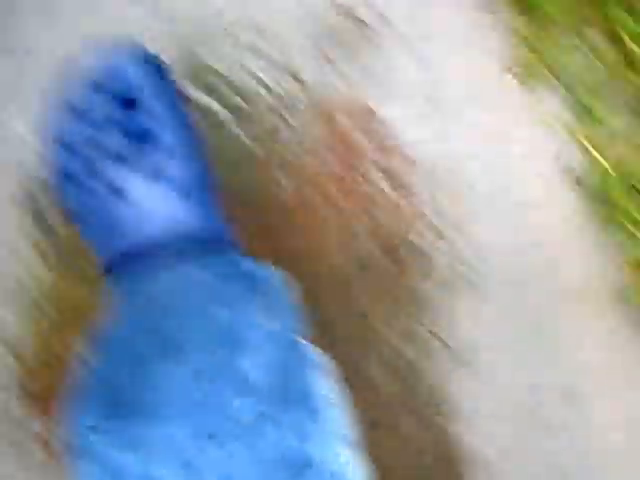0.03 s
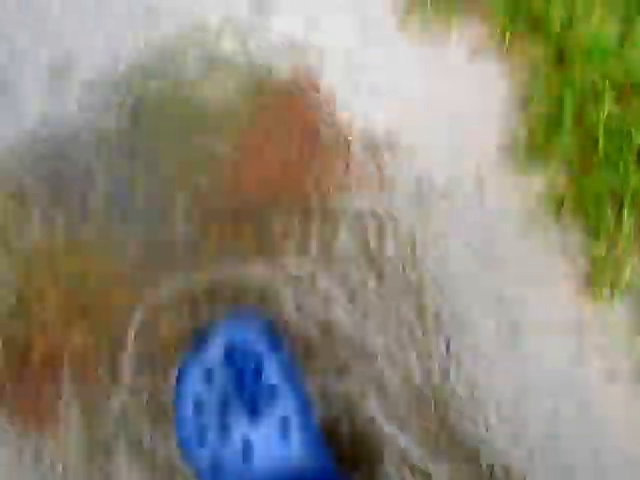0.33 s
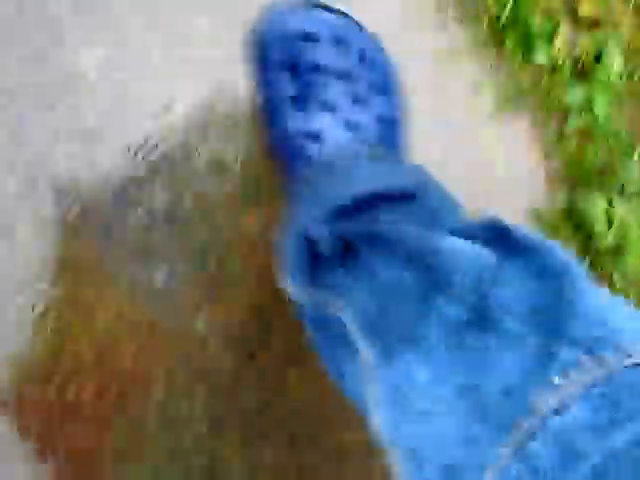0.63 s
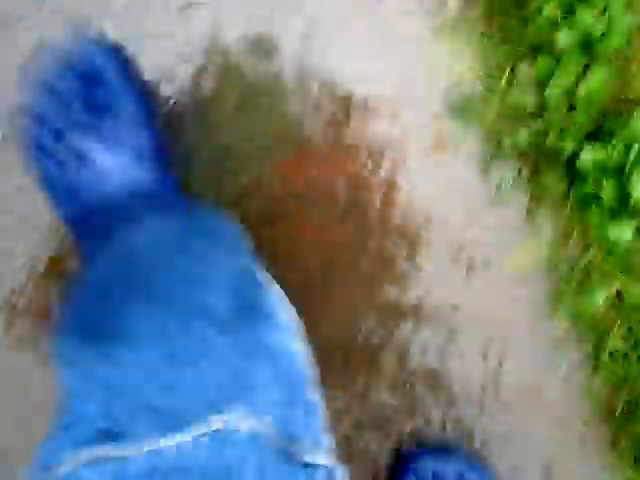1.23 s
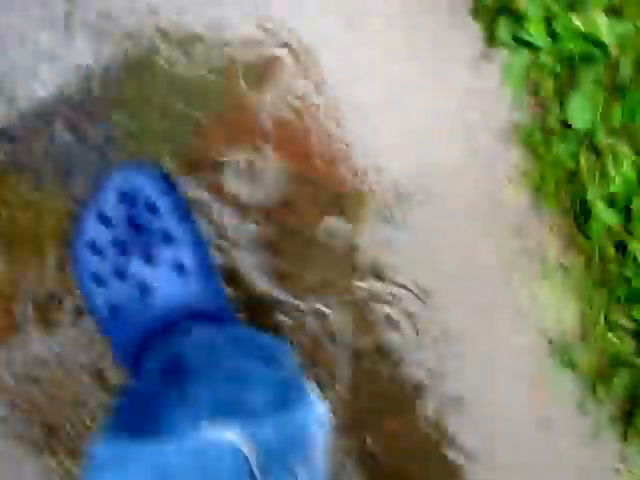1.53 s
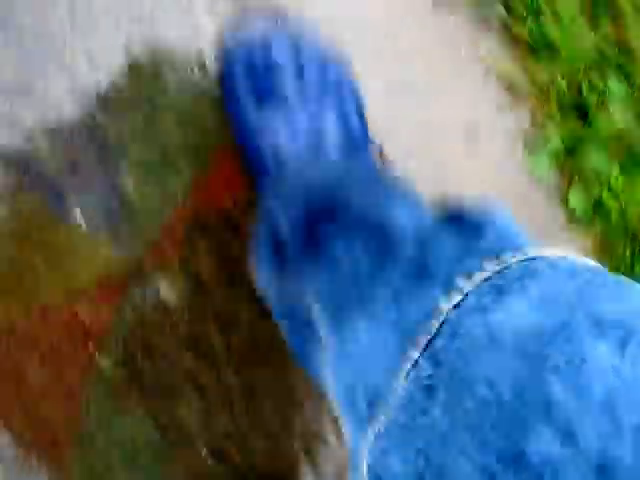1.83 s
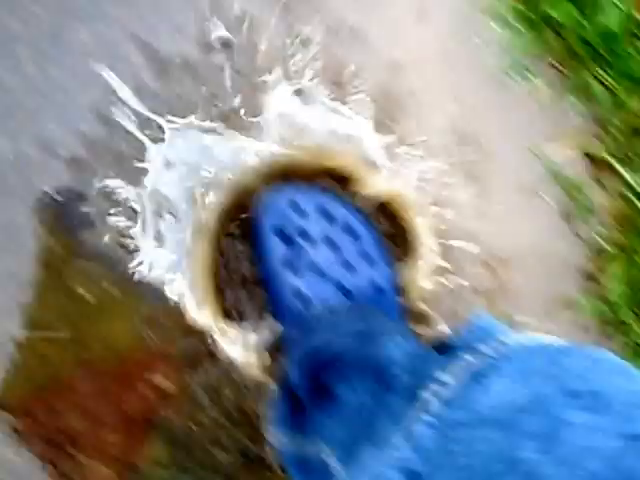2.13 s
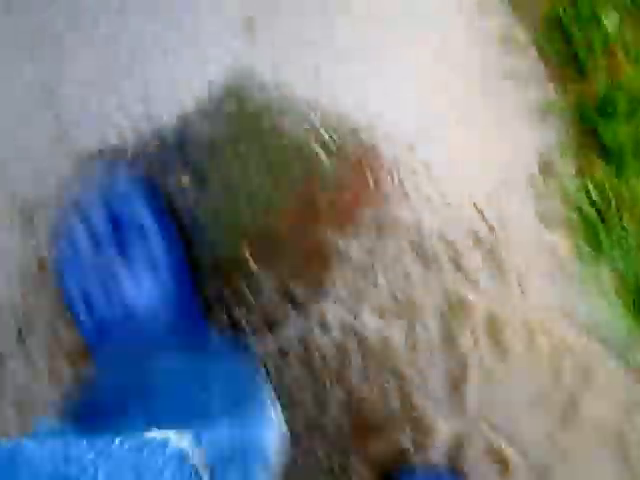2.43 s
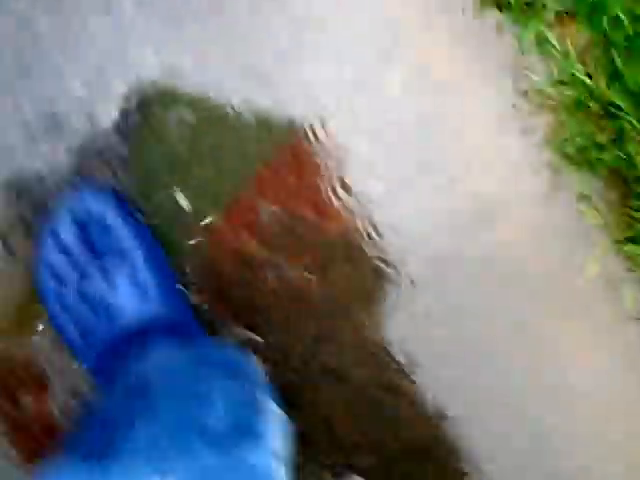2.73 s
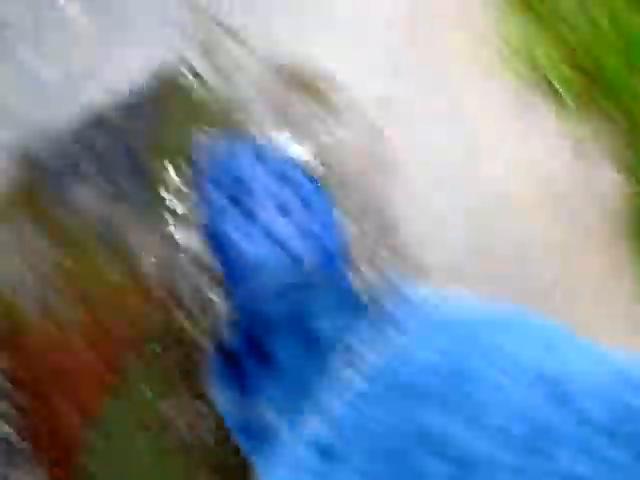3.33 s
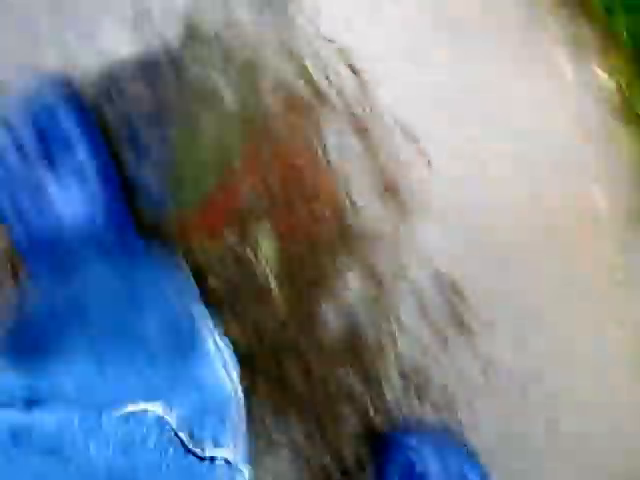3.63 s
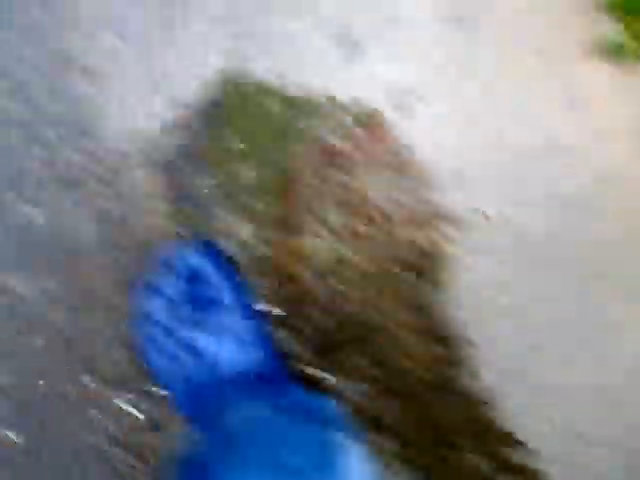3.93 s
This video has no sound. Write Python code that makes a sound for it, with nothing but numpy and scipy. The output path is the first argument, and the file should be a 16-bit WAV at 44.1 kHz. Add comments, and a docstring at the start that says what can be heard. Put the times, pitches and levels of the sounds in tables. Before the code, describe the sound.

Footsteps in rubber clogs splash through shallow puddles at a walking pace, each throwing a fine spray and a few plinking drops. Loud gusts rumble and flutter on the close microphone, with light rain hissing faintly outdoors.

```python
"""Puddle steps in gusty wind

Someone in rubber clogs walks through shallow puddles, about three steps in two seconds. Each step
throws a fine spray and a few drops that click and ring as bubbles. Wind eddies rumble, flutter and
slap on the microphone and overload it at the peaks; light rain hisses behind."""
import sys
import numpy as np
from scipy import signal
from scipy.io import wavfile
from scipy.ndimage import uniform_filter1d

SR = 44100
rng = np.random.default_rng(int(sys.argv[2]) if len(sys.argv) > 2 else 0)


def store_wav(level_fs):
    """Save 16-bit WAV to argv[1]."""
    pcm = np.round(np.clip(np.atleast_2d(level_fs), -1, 1) * 32767)
    wavfile.write(sys.argv[1], SR, pcm.T.astype(np.int16))


N = 176400
T = np.arange(N) / SR


def from_db(db):
    """Decibels to gain."""
    return 10 ** (np.asarray(db) / 20)


def rms_one(x):
    """Scale to rms 1."""
    return x / np.sqrt(np.mean(x ** 2) + 1e-20)


def in_time(rows):
    """A control curve through (seconds, value) points."""
    return np.interp(T, *np.transpose(rows))


def swell(peak_s, rise, fall):
    """A smooth rise to 1 at peak_s, then an exponential fall."""
    return np.exp(np.where(T < peak_s, -((T - peak_s) / rise) ** 2, (peak_s - T) / fall).clip(-30, 0))


def drift(rate_hz):
    """A smooth random wander of rms about 1, mostly slower than rate_hz."""
    hop = 40
    pole = np.exp(-2 * np.pi * rate_hz * hop / SR)
    slow = signal.lfilter([1], [1, -2 * pole, pole * pole], rng.standard_normal(N // hop + 2002))[2000:]
    return np.interp(np.arange(N) / hop, np.arange(len(slow)), rms_one(slow))


def noise_bands(colour, low_hz, count, order=3):
    """Half-octave noises as (centre in Hz, noise); together they have an rms of about 1."""
    centres = low_hz * 2 ** (np.arange(count) / 2)
    colour_hz, colour_db = np.transpose(colour)
    gains = from_db(np.interp(np.log(centres), np.log(colour_hz), colour_db)) * np.sqrt(centres)
    for hz, gain in zip(centres, gains / np.linalg.norm(gains)):
        sos = signal.butter(order, [hz / 2 ** .25, hz * 2 ** .25], "band", fs=SR, output="sos")
        yield hz, gain * rms_one(signal.sosfilt(sos, rng.standard_normal(N + SR // 2))[-N:])


# The level of the hiss of light rain and wind, swelling with the strongest gust.
# Each row: time in seconds, level in dB before the trim.
HISS_LEVELS = [(0.02, -56.5), (0.33, -53.5), (1.18, -54.5), (1.5, -49.5), (1.82, -56.5), (2.32, -53),
               (2.41, -56), (3.71, -57.5), (3.98, -55.5)]
# The tone of the hiss. Each row: frequency in Hz, relative density in dB.
HISS_TONE = [(400, 14), (900, 3), (1800, 2), (3000, 0), (5200, -3), (8000, -8), (12000, -11.5),
             (15500, -15.5)]


def rain_and_wind_hiss(patchy_db=2.65, trim_db=7):
    """Light rain and wind make a soft hiss, each band flickering a little on its own."""
    bands = noise_bands(HISS_TONE, low_hz=440, count=11, order=2)
    hiss = sum(band * from_db(patchy_db * drift(rate_hz=45)) for _, band in bands)
    return from_db(in_time(HISS_LEVELS) + trim_db) * hiss


# The ride of the wind's low end. Each row: time in seconds, level in dB.
RUMBLE_LEVELS = [(0.02, -13.5), (0.58, -9.5), (0.61, -12.5), (1.17, -15), (1.36, -5), (1.61, -8.5),
                 (1.65, -21), (1.67, -10.5), (2.3, -17), (2.39, -6.5), (2.46, -12.5), (2.66, -11),
                 (2.68, -17.5), (2.94, -28.5), (3.01, -21), (3.2, -32), (3.24, -12), (3.3, -24),
                 (3.37, -10), (3.43, -21), (3.6, -17.5), (3.75, -24), (3.91, -11.5), (3.98, -7)]
# The tone of the rumble. Each row: frequency in Hz, relative density in dB.
RUMBLE_TONE = [(16, -4), (28, 7), (40, -11), (60, -2), (100, -13.5), (150, -24.5), (250, -53)]


def wind_rumble(neutral_db=-17.5, brightening=0.22):
    """Large eddies rock the diaphragm slowly; in a lull only the slowest are left."""
    level_db = in_time(RUMBLE_LEVELS)
    tilt_db = brightening * (level_db - neutral_db)  # per octave
    bands = noise_bands(RUMBLE_TONE, low_hz=18, count=8)
    rumble = sum(band * from_db(tilt_db * np.log2(hz / 40)) for hz, band in bands)
    running_rms = np.sqrt(uniform_filter1d(rumble ** 2, size=7000) + 1e-9)
    return rumble / running_rms * from_db(level_db)


# The breeze under the gusts. Each row: time in seconds, wind strength in dB.
BREEZE_STRENGTH = [(0, -17.5), (0.1, -26), (0.4, -28), (0.7, -40), (0.85, -29.5), (1.08, -26.5), (1.3, -21),
                   (1.8, -27.5), (2.1, -29), (2.68, -25), (2.87, -49), (3.15, -52.5), (3.3, -37.5),
                   (3.8, -42), (3.98, -28.5)]
# Gusts that swell and sink. Each row: peak time, rise and fall in seconds, wind strength in dB.
GUST_SWELLS = [(0.517, 0.068, 0.067, -11), (1.401, 0.065, 0.066, -12), (1.515, 0.054, 0.081, -14.5),
               (2.387, 0.069, 0.03, -17), (2.625, 0.053, 0.029, -19)]
# The tone of the flutter. Each row: frequency in Hz, relative density in dB.
FLUTTER_TONE = [(90, 0), (130, -0.5), (180, 2.5), (255, -0.5), (360, -6), (510, -11), (720, -16),
                (1020, -28.5), (1440, -38), (2040, -50.5)]


def wind_flutter(fit_db=2.5, neutral_db=-18, brightening=0.66, trim_db=-1):
    """Small eddies come in fits; the harder the gust, the higher their noise reaches."""
    gusts = sum(from_db(db) * swell(peak_s, rise, fall) for peak_s, rise, fall, db in GUST_SWELLS)
    wind = from_db(in_time(BREEZE_STRENGTH)) + gusts
    eddies = np.clip(drift(rate_hz=43.4), -2, 2)
    tears = np.clip(drift(rate_hz=186), -2, 2)  # the flow tears off the edge of the microphone port
    force_db = 20 * np.log10(wind) - neutral_db + fit_db * (eddies + tears)
    out = 0
    for hz, band in noise_bands(FLUTTER_TONE, low_hz=90, count=10):
        sensitivity = 1 + brightening * np.log2(np.clip(hz, 360, 1100) / 400)
        out += band * from_db(sensitivity * force_db)
    return from_db(neutral_db + trim_db) * out


# Single eddies that slap the microphone. Each row: start in seconds, length in seconds,
# level in dB, tilt around 400 Hz in dB per octave.
EDDY_SLAPS = [(0.111, 0.005, -14, -4.7), (0.133, 0.0042, -16, -11), (0.157, 0.0091, -24, -3.5),
              (0.22, 0.021, -18, -6), (0.341, 0.022, -23.5, -8), (0.457, 0.0058, -19.5, -7),
              (0.495, 0.022, -18.5, -7.5), (0.515, 0.0044, -13.5, 3.5), (0.536, 0.0064, -20.5, 4.5),
              (0.56, 0.011, -14.5, -11), (0.581, 0.0082, -15.5, 1), (0.613, 0.0095, -20, -4.5),
              (0.643, 0.0085, -19.5, -9), (0.667, 0.0029, -17.5, -6.5), (0.732, 0.0048, -15, -8.5),
              (0.74, 0.0045, -19.5, -9.5), (0.782, 0.012, -20.5, -7.5), (0.874, 0.009, -25, -8),
              (0.907, 0.0037, -17.5, -9), (0.936, 0.0064, -23, -4.5), (0.98, 0.0055, -12.5, -6),
              (1.206, 0.013, -18.5, -3.5), (1.237, 0.0084, -12.5, 0), (1.31, 0.0058, -8.5, -2),
              (1.339, 0.0048, -16.5, 1.5), (1.458, 0.0056, -11, 4.5), (1.473, 0.0063, -14, 5),
              (1.517, 0.026, -19.5, 7), (1.574, 0.0064, -9, -2.2), (1.638, 0.0062, -10.5, -2.6),
              (1.665, 0.0042, -15.5, -7.5), (2.002, 0.019, -28, -8), (2.394, 0.0039, -19, 11.5),
              (2.405, 0.0067, -19, 2.5), (2.505, 0.0087, -20.5, -14), (2.544, 0.013, -11.5, -4.5),
              (2.601, 0.032, -23.5, -4), (2.636, 0.011, -24.5, -1), (2.659, 0.02, -22.5, -7.0),
              (2.725, 0.013, -28.5, -12.5), (3.017, 0.0069, -30.0, -0.5), (3.065, 0.0068, -32.5, -4),
              (3.226, 0.006, -28, -10.5), (3.265, 0.0066, -31, -13.5), (3.331, 0.021, -16, -7),
              (3.496, 0.0024, -22.0, -9), (3.566, 0.0033, -28.5, -6), (3.601, 0.0069, -20.5, -8),
              (3.897, 0.0051, -23.5, -14.5), (3.932, 0.0053, -21.5, -9)]
# The tone of a slap before its tilt. Each row: frequency in Hz, relative density in dB.
SLAP_TONE = [(90, -12), (180, -2), (360, -4), (510, -5.5), (720, -8.5), (1020, -14.5), (1440, -22.5),
             (2040, -37)]


def wind_buffets(rise_share=.3):
    """Each eddy is a dull slap that rises quickly and is gone; the brightest reach the upper mids."""
    start_s, lengths, level_db, tilt_db = np.transpose(EDDY_SLAPS)
    out, t = np.zeros(N), T[:SR // 8]
    for hz, band in noise_bands(SLAP_TONE, low_hz=90, count=10):
        gains = from_db(level_db + tilt_db * np.log2(hz / 400))
        push = np.zeros(N + SR)
        for start, length, gain in zip((start_s * SR).astype(int), lengths, gains):
            attack = np.minimum(t / (rise_share * length), 1)
            push[start:start + len(t)] += gain * attack * np.exp(-.5 * (t / length) ** 4)
        # Hold the noise steady so that no slap lands in a dip.
        leveller = band.std() / np.sqrt(uniform_filter1d(band ** 2, size=500) + 1e-14)
        out += band * leveller * push[:N]
    return out


def droplets(hz, per_s, ring_cycles=12, spread_db=6):
    """Tiny droplets of random size ring at one pitch, each fading 60 dB over ring_cycles."""
    born = rng.random(N) < per_s / SR
    sizes = from_db(spread_db * np.minimum(rng.exponential(1, N), 4)) * rng.choice([-1, 1], N)
    pole = np.exp(-np.log(1000) * hz / (ring_cycles * SR))
    resonator = [1, -2 * pole * np.cos(2 * np.pi * hz / SR), pole * pole]
    return rms_one(signal.lfilter([1, 0, -1], resonator, born * sizes + 1e-18))


# A clog pushes the water aside. Each row: peak time, rise and fall in seconds, level in dB,
# tilt around 6000 Hz in dB per octave.
STEP_SPLASHES = [(0.19, .022, 0.035, -42.5, -1.5), (0.53, 0.035, .08, -51, -11),
                 (0.872, .035, 0.047, -42.5, 0), (1.0, 0.02, .03, -50.5, -5), (1.495, 0.022, 0.02, -45, -1),
                 (2.135, 0.0056, 0.017, -39.5, 3), (2.172, 0.016, 0.019, -36.5, -2),
                 (2.32, 0.045, 0.14, -52, 2), (2.8, 0.091, 0.17, -56.5, -5.5),
                 (3.288, 0.0064, 0.014, -46.5, 5), (3.355, 0.024, .045, -47.5, 1.5),
                 (3.515, 0.028, 0.033, -47.5, -5), (3.79, .03, 0.051, -57, 7),
                 (3.899, 0.0076, 0.014, -39.5, -3.5)]
# The tone of the spray before its tilt. Each row: frequency in Hz, relative density in dB.
SPRAY_TONE = [(900, -19), (1600, -3), (3000, 1.5), (5000, 5.5), (7500, 3.5), (11000, -2), (15500, -7.5)]


def splashes(droplets_per_s=9000, mist_share=0.29):
    """Each step throws up a spray: tiny ringing droplets over a fine mist, swelling and dying away."""
    swells = np.array([swell(peak_s, rise, fall) for peak_s, rise, fall, _, _ in STEP_SPLASHES])
    *_, level_db, tilt_db = np.transpose(STEP_SPLASHES)
    bands = list(noise_bands(SPRAY_TONE, low_hz=1200, count=8, order=2))
    out = 0
    for hz, mist in bands:
        pitches = hz * 2 ** (np.arange(-1, 2) / 6)
        per_s = droplets_per_s / (len(pitches) * len(bands))
        patter = mist.std() * rms_one(sum(droplets(pitch, per_s) for pitch in pitches))
        spray = np.sqrt(mist_share) * mist + np.sqrt(1 - mist_share) * patter
        envelope = from_db(level_db + tilt_db * np.log2(hz / 6000)) @ swells
        out += spray * envelope
    return out


# Single drops and slaps of water. Each row: start in seconds, bubble peak in dB,
# starting pitch in Hz, click trim in dB.
WATER_DROPS = [(0.099, -43, 9000, 9), (0.171, -33, 1980, -1), (0.412, -40.5, 12000, 7),
               (0.513, -26, 2840, -7), (0.943, -36, 6500, 3), (1.002, -44, 11000, 0),
               (1.016, -38, 13000, -9), (1.396, -31, 11500, 1.5), (2.169, -22, 1760, -8),
               (2.22, -34.5, 6960, -6), (2.290, -31, 2680, 4.5), (2.311, -26.5, 1800, -14),
               (2.318, -27, 13200, -15), (2.341, -33, 2970, -10), (2.367, -34, 6800, -10),
               (2.387, -25, 3060, -8), (2.393, -20.5, 1410, -11), (2.414, -34, 1670, 2),
               (2.421, -32, 5700, 0), (2.610, -32, 6400, -0.5), (2.849, -35.5, 2570, -14),
               (2.899, -29, 2480, -4), (3.062, -41, 5000, -9), (3.252, -43, 7000, 7),
               (3.307, -36.5, 2900, -7), (3.372, -33, 4870, -10), (3.40, -37.5, 3220, -10),
               (3.428, -41, 7500, -8), (3.822, -36, 4340, 6.5)]


def drops(ring_cycles=31, pitch_rise=0.04, click_decay_s=0.0021):
    """A drop lands with a click and traps a bubble that rings briefly, rising in pitch."""
    out, t = np.zeros(N + SR), T[:SR // 20]
    click_band = signal.butter(1, [1500, 12000], "band", fs=SR, output="sos")
    for start_s, level_db, hz, click_db in WATER_DROPS:
        age = t * hz / ring_cycles  # 1 when the bubble has faded 60 dB
        pitch = hz * (1 + pitch_rise * np.minimum(age, 1))
        bubble = np.sin(2 * np.pi * np.cumsum(pitch) / SR) * np.exp(-np.log(1000) * age)
        noise = rms_one(signal.sosfilt(click_band, rng.standard_normal(len(t))))
        click = .5 * from_db(click_db) * noise * np.exp(-t / click_decay_s)
        start = int(start_s * SR)
        out[start:start + len(t)] += from_db(level_db) * (bubble + click)
    return out[:N]


def scene():
    """Wind at the microphone, water at the feet and a hiss behind, mixed in mono."""
    wind = wind_rumble() + wind_flutter() + wind_buffets()
    return (wind + splashes() + drops() + rain_and_wind_hiss())[None]


def record(dry):
    """The strongest gusts flatten against the microphone's overload limit; the very top is cut."""
    ceiling, knee, stop_hz = .98, 10, 16450
    clipped = dry / (1 + np.abs(dry / ceiling) ** knee) ** (1 / knee)
    return signal.sosfilt(signal.cheby2(16, 70, stop_hz, fs=SR, output="sos"), clipped)


dry = scene()
out = record(dry)
store_wav(out)
```